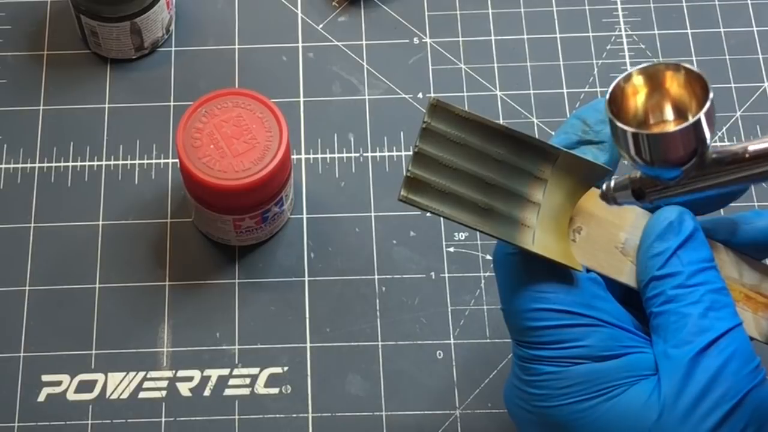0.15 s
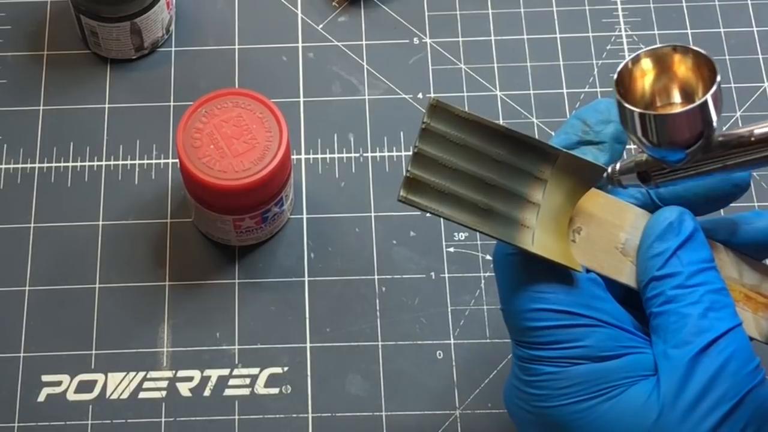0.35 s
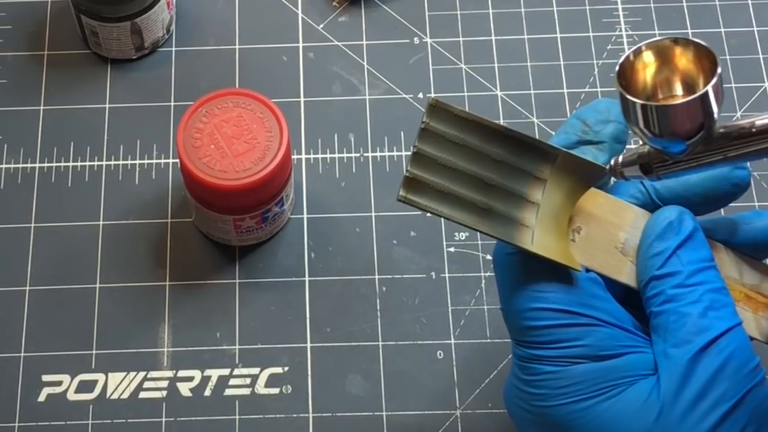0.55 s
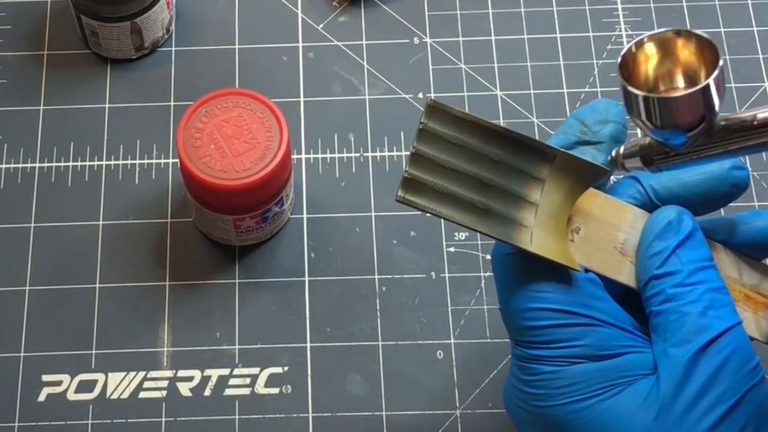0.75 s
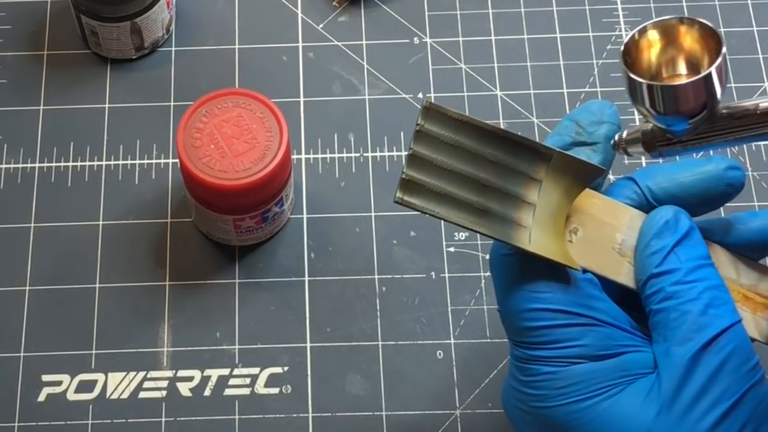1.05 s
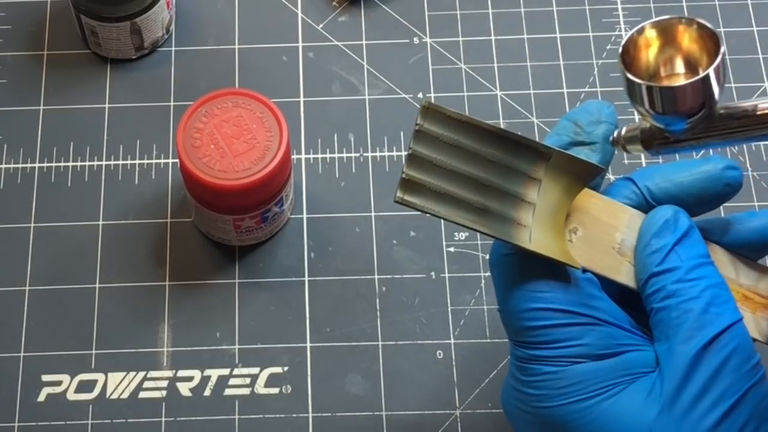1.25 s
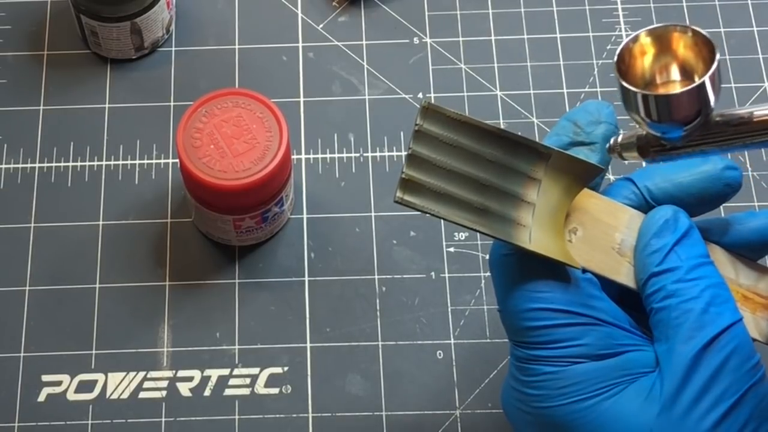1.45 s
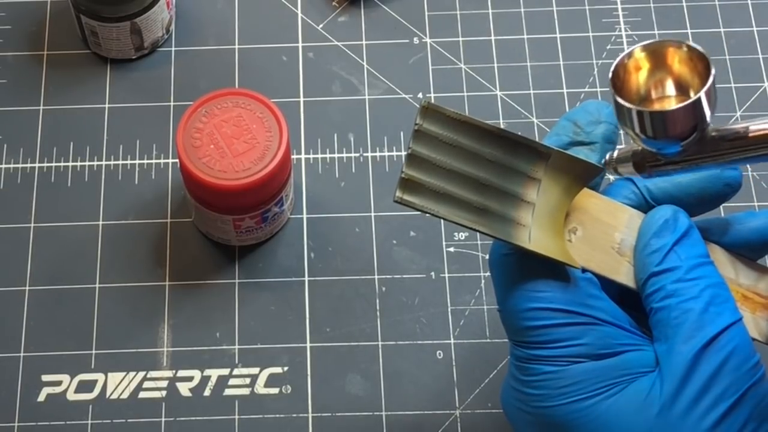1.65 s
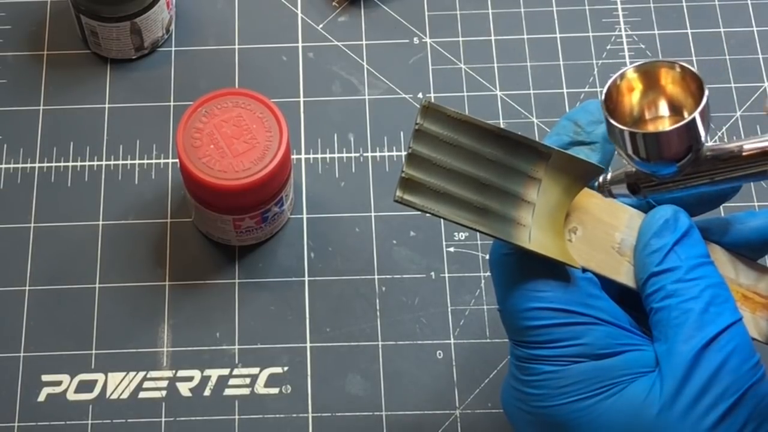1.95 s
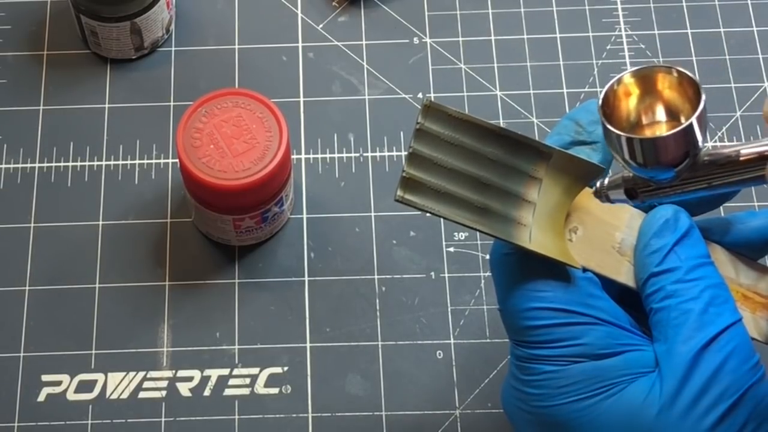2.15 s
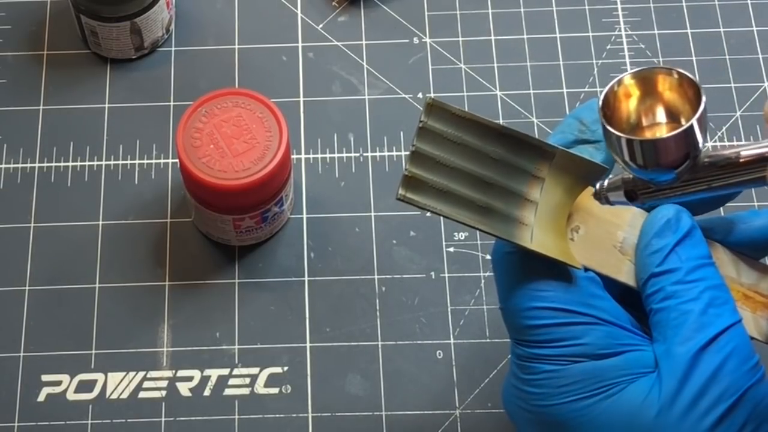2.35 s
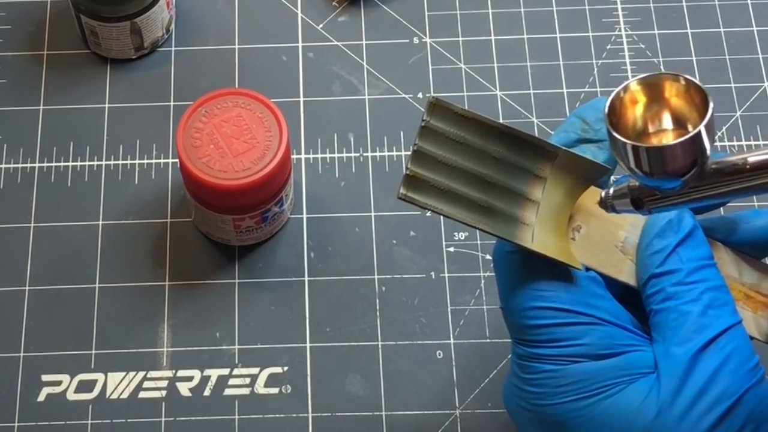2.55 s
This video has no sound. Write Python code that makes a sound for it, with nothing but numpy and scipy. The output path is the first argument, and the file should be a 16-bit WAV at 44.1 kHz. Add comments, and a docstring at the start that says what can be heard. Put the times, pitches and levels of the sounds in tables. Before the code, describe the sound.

Close, dry mono sound of an airbrush at a work bench: thin continuous air hiss, one sudden broad whoosh around 1.2 seconds, a weaker puff soon after, and a steady low compressor hum underneath.

```python
"""An airbrush sprays a small ribbed part on a work bench, heard close by in mono.
Its free jet is coloured noise that hisses up to the very top.
Where the jet sweeps over edges of the part, a second noise swells into a broad rush.
Bench and part colour this air noise and add short echoes.
Behind it a piston compressor hums under the bench: a sum of tones on multiples of its shaft rate."""
import sys
import numpy as np
from scipy import signal
from scipy.fft import rfft, irfft
from scipy.io import wavfile
from scipy.ndimage import uniform_filter1d

SR = 44100
rng = np.random.default_rng(int(sys.argv[2]) if len(sys.argv) > 2 else 0)


def to_wav(sig):
    """Store sig (one row per channel, or 1-D mono) as 16-bit WAV at the path in sys.argv[1].

    Samples outside -1..1 are clipped; the rate is SR.
    """
    pcm = np.clip(np.atleast_2d(sig), -1, 1) * 32767
    pcm = np.round(pcm).astype(np.int16)
    wavfile.write(sys.argv[1], SR, pcm.T)  # frames by channels


N = 119070


def undb(db):
    """Turn decibels into a plain multiplier."""
    return 10 ** (np.asarray(db) / 20)


def curve(table, col=1):
    """Draw straight lines between the points of a table column, one value per sample."""
    table = np.array(table, float)
    return np.interp(np.arange(N) / SR, table[:, 0], table[:, col])


def walk(rate_hz):
    """Wander smoothly and at random around 0, with a spread near 1."""
    hold = int(SR / rate_hz)
    steps = np.repeat(rng.standard_normal(N // hold + 1), hold)
    smooth = uniform_filter1d(uniform_filter1d(steps, hold), hold)
    return 1.29 * smooth[:N]  # smoothing shrinks the spread


def bands(shape, per_octave=3):
    """Colour noise by a (frequency, level) table, then yield its overlapping bands as (centre, signal)."""
    hz = np.fft.rfftfreq(N, 1 / SR) + 1  # +1 keeps the logarithm finite
    shape = np.array(shape, float)
    colour_db = np.interp(np.log(hz), np.log(shape[:, 0]), shape[:, 1])
    spectrum = rfft(rng.standard_normal(N)) * undb(colour_db)
    spectrum = spectrum / np.std(irfft(spectrum, N))  # whole noise at rms 1
    place = per_octave * np.log2(hz)
    lowest = int(per_octave * np.log2(shape[0, 0])) - per_octave
    for k in range(lowest, 14 * per_octave + 1):
        triangle = np.clip(1 - abs(place - k), 0, 1)
        yield 2 ** (k / per_octave), irfft(spectrum * triangle, N)


FLICKER_DB = 0.5  # spread of the fast flicker of each band, in hiss and rush

# colour of the steady hiss of jet and motor: (frequency [Hz], relative level per Hz [dB])
HISS_COLOUR = [(30, -34), (100, -10), (300, -11), (550, -16), (750, -8.5), (1300, -9), (1800, -10.5),
               (2270, -12.5), (2800, -10.5), (3280, -8), (3600, -10), (4600, -16), (7000, -13), (10300, -9),
               (11400, -9.5), (12300, -10.5), (13300, -12), (14200, -3), (15600, -1.5)]
# level of the top of the hiss, bands centred from 13 kHz: (time [s], level [dB])
HISS_TOP = [(0, -3), (.09, 2), (.16, 3.5), (.5, 4.5), (.6, 5.5), (.9, 4), (1.15, 3.5), (1.36, 5.5),
            (1.46, 3), (1.55, 5.5), (1.86, 5), (2.44, 3.5), (2.7, 1)]
# level of the low-middle hiss, round 1.1 kHz: (time [s], level [dB])
HISS_LOW_MIDDLE = [(0, 0), (.39, 3), (.55, -0.5), (.9, -2.5), (1.3, -6), (1.6, -3), (1.92, 2.5), (2.3, 0.5),
                   (2.5, -1), (2.67, 2)]
HISS_DB, SWELL_DB, TOP_FLICKER_DB = -33.5, 1, 1.0  # overall level; spread of slow swell and top flicker


def hiss():
    """Steady turbulence: each band swells and flickers alone; top and low middle follow their levels."""
    top_db = curve(HISS_TOP) + TOP_FLICKER_DB * walk(29.8)
    low_db = curve(HISS_LOW_MIDDLE)
    out = 0
    for hz, band in bands(HISS_COLOUR):
        level_db = SWELL_DB * walk(2.34) + FLICKER_DB * walk(25.1)
        if hz > 12500:
            level_db = level_db + top_db
        if 700 < hz < 1700:
            level_db = level_db + low_db
        out = out + band * undb(level_db)
    return out * undb(HISS_DB)


# colour of the air breaking on the part: (frequency [Hz], relative level per Hz [dB])
RUSH_COLOUR = [(500, -38), (1090, -13.5), (1500, -13), (1900, -10.5), (2800, -9.5), (3500, -7),
               (4800, -4.5), (5400, -2), (6420, -2), (8000, -2.5), (9000, -8.5), (10500, -15),
               (11350, -7.5), (11800, -12.5), (13200, -20), (15700, -16)]
# how hard the jet hits the part: (time [s], level [dB], tilt round 5 kHz [dB per octave])
JET_IMPACT = [(0, -43, -1.5), (.1, -41.5, -6), (.19, -44.5, -2.5), (.5, -46.5, -2), (.75, -46.5, -2),
              (.92, -40, -4), (1, -34.5, -2), (1.08, -30, 0.5), (1.15, -33, -0.5), (1.175, -26.5, 1),
              (1.2, -22, 0.5), (1.23, -21.5, 1.5), (1.255, -22, 2.5), (1.29, -30, 0.5), (1.32, -36, -2.5),
              (1.36, -39, -2), (1.45, -33, -1.5), (1.52, -40, -2.5), (1.62, -41.5, -5), (1.75, -47, 0),
              (2.2, -48, 4.5), (2.44, -45, -4), (2.52, -39.5, -4.5), (2.6, -41.5, -3), (2.7, -43, -3.5)]
SPUTTER_DB = 0.6  # spread of the fast level changes shared by all bands


def rush():
    """The jet breaks on ribs and edges: a broad sputtering rush, fuller or thinner with the angle."""
    tilt_db = curve(JET_IMPACT, col=2)
    sputter_db = SPUTTER_DB * walk(39.98)
    out = 0
    for hz, band in bands(RUSH_COLOUR):
        level_db = tilt_db * np.log2(hz / 5000) + FLICKER_DB * walk(29.87)
        out = out + band * undb(level_db)
    return out * undb(curve(JET_IMPACT) + sputter_db)


# dips and narrow peaks from bench, part and microphone:
# (frequency [Hz], distance to 1/e of the dB change [Hz], change [dB])
DIPS_AND_PEAKS = [(1427, 26, -5), (2150, 42, -0.5), (2513, 46, -4.5), (2770, 90, 1.5), (3073, 75, -9.5),
                  (3286, 80, 3.5), (3940, 26, -1.5), (4420, 41, -6), (7110, 120, -5), (9350, 110, -2.5),
                  (11430, 91, 3), (12640, 300, -4)]
# inverted echoes off things on the bench: (delay [ms], level [dB])
BENCH_ECHOES = [(2.7, -24.5), (3.14, -24), (4.35, -18.5)]


def bench(air):
    """Nearby surfaces weaken or lift narrow bands of the air noise and return short echoes."""
    hz = np.fft.rfftfreq(N, 1 / SR)
    change_db = sum(db * np.exp(-((hz - centre) / width) ** 2) for centre, width, db in DIPS_AND_PEAKS)
    coloured = irfft(rfft(air) * undb(change_db), N)
    echoes = sum(undb(db) * np.roll(coloured, round(ms * SR / 1000)) for ms, db in BENCH_ECHOES)
    return coloured - echoes


# tones of the compressor: (multiple of the shaft rate, relative level [dB])
SHAFT_TONES = [(1, -36), (2, -11), (3, -4), (4, -23.5), (5, -5), (6, -1.5), (7, -12.5), (8, 1), (9, -6.5),
               (10, -1), (11, -14), (12, -6), (13, -2.5), (14, -16), (15, -16.5), (16, -12), (17, -46),
               (18, -22.5), (19, -19), (20, -28.5), (21, -59), (22, -21), (23, -23.5), (24, -20), (25, -28),
               (26, -28.5), (27, -14), (28, -37.5), (29, -24), (30, -40.5), (31, -28), (32, -22), (33, -18)]
# the hum shifts level and phase at two joins; each row holds from its time on:
# (time [s], level [dB], phase [rad])
HUM_SHIFTS = [(0, -2, 1.1), (.525, 0, 0), (2.665, -2.5, 0.98)]
# the case turns the phase of tones between two resonances: (low [Hz], high [Hz], turn [rad])
CASE_PHASE = (150, 232, 2.0)
SHAFT_HZ, SHAFT_DRIFT_TURNS = 27.256, 0.00033  # shaft rate; spread of its drift
KNOCK_S, KNOCK_RAD = 0.0076, 1.1  # place of the piston knock in the turn, and its shape
# peak of a 0 dB tone in the middle stretch, between the two shifts; spread of each tone's waver
HUM_DB, WAVER_DB = -43, 0.5
SHIFT_S = 0.028  # length of the glide at each shift
LOW_LAG_RAD = 10.0  # low tones trail the knock by this over the multiple squared
LOOSE_ABOVE_HZ = 450  # higher tones are not tied to the knock


def compressor():
    """Each shaft turn brings one knock, which repeats into steady tones that waver a little."""
    t = np.arange(N) / SR
    steps = np.array(HUM_SHIFTS, float)
    row = np.searchsorted(steps[:, 0], t, side="right") - 1
    glide = int(SHIFT_S * SR)
    shift_db = uniform_filter1d(steps[row, 1], glide)
    shift_rad = uniform_filter1d(steps[row, 2], glide)
    shaft_rad = 2 * np.pi * (SHAFT_HZ * (t - KNOCK_S) + SHAFT_DRIFT_TURNS * walk(1.9))
    case_low, case_high, case_rad = CASE_PHASE
    out = 0
    for k, tone_db in SHAFT_TONES:
        hz = k * SHAFT_HZ
        tone_rad = KNOCK_RAD - LOW_LAG_RAD / k ** 2
        if case_low < hz < case_high:
            tone_rad += case_rad
        if hz > LOOSE_ABOVE_HZ:
            tone_rad += 2 * np.pi * rng.random()
        level = undb(tone_db + WAVER_DB * walk(12))
        out = out + level * np.cos(k * shaft_rad + tone_rad + shift_rad)
    return out * undb(HUM_DB + shift_db)


def scene():
    """Add the air noise off the bench and the hum, the same in both channels."""
    air = bench(hiss() + rush())
    return np.tile(air + compressor(), (2, 1))


TOP_HZ = 15740  # upper edge of the sound


def record(dry):
    """A steep low-pass filter cuts off the top."""
    # order 14, 0.3 dB ripple below the edge, 80 dB cut in the stopband
    low_pass = signal.ellip(14, 0.3, 80, TOP_HZ, fs=SR, output="sos")
    return signal.sosfilt(low_pass, dry)


dry = scene()
out = record(dry)
to_wav(out)
```